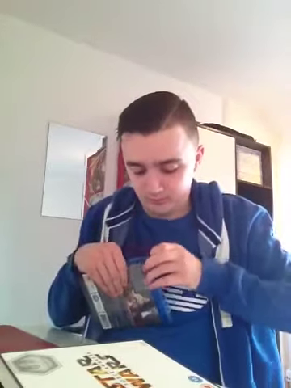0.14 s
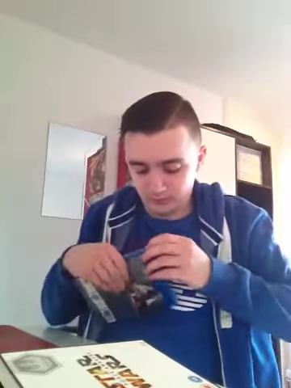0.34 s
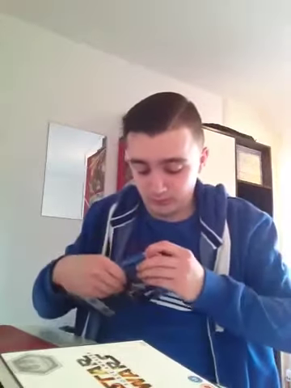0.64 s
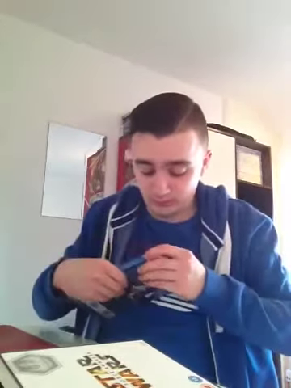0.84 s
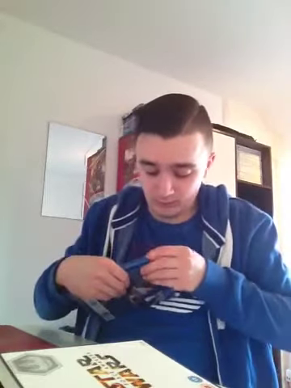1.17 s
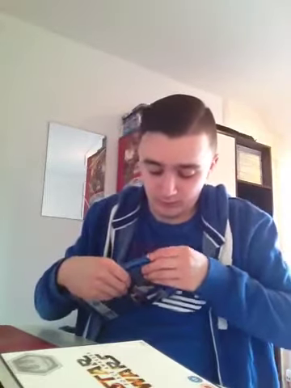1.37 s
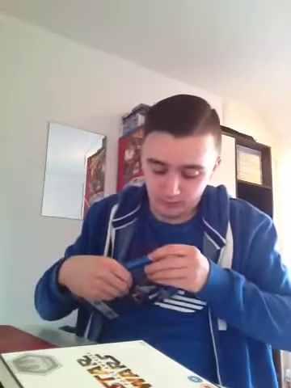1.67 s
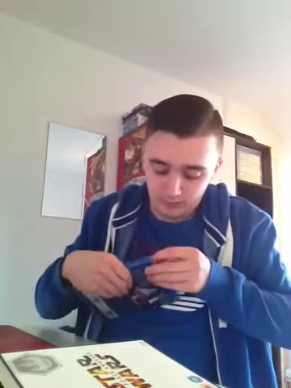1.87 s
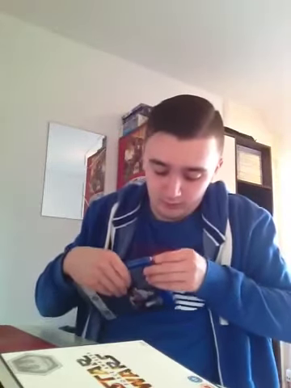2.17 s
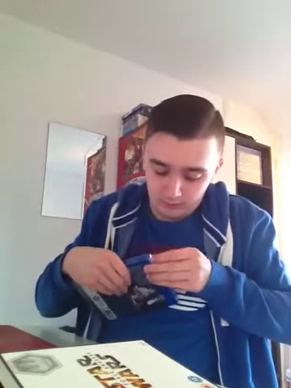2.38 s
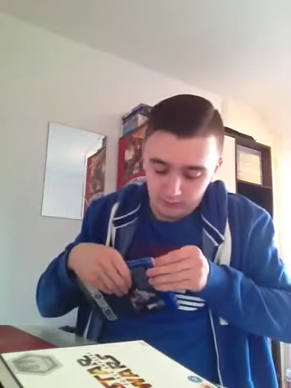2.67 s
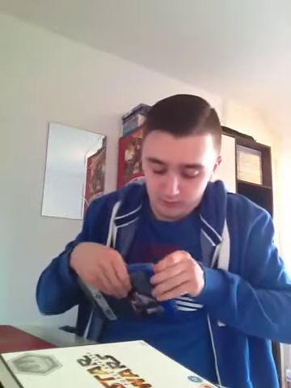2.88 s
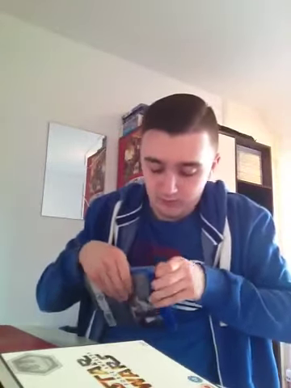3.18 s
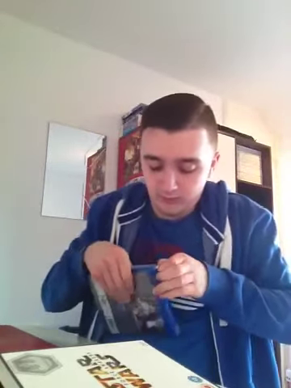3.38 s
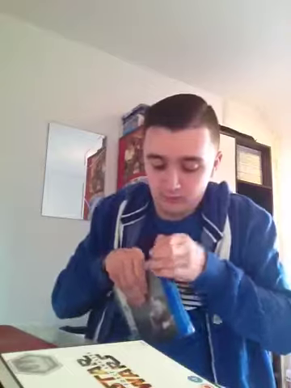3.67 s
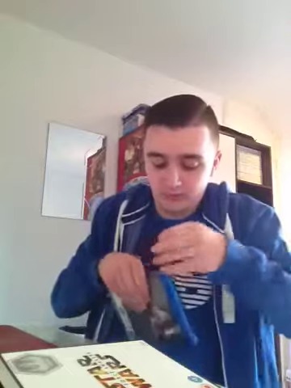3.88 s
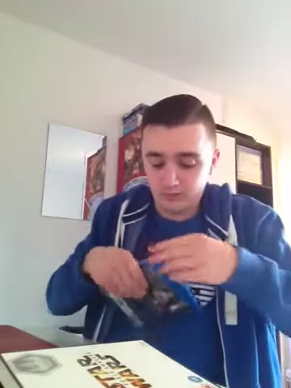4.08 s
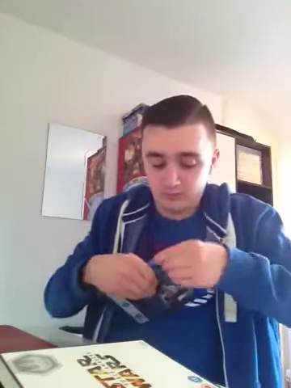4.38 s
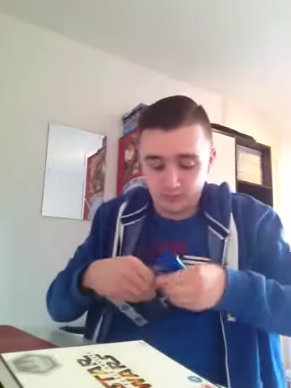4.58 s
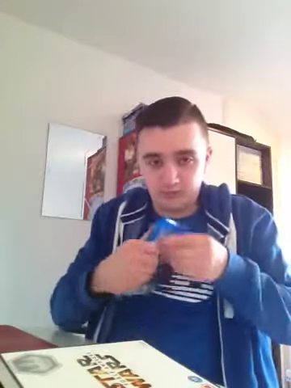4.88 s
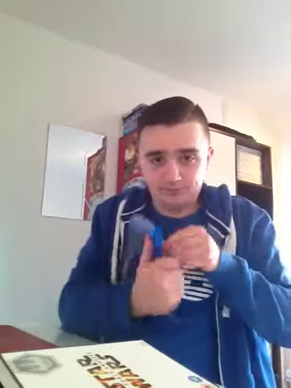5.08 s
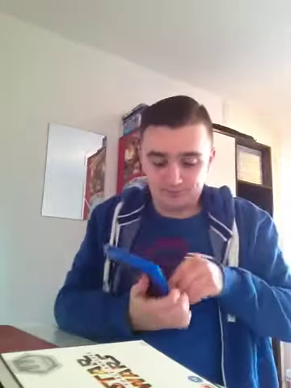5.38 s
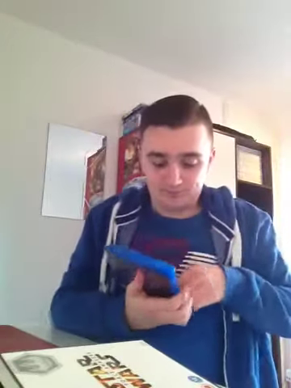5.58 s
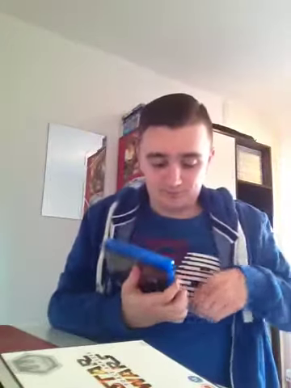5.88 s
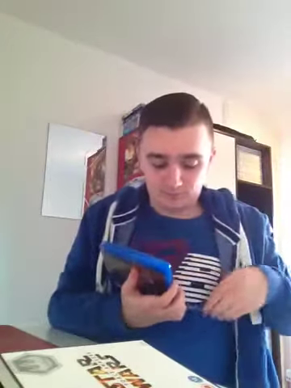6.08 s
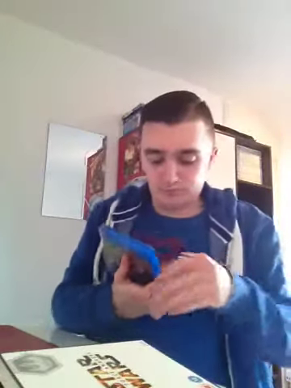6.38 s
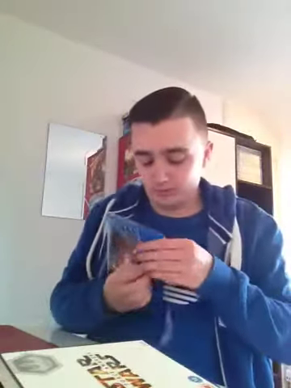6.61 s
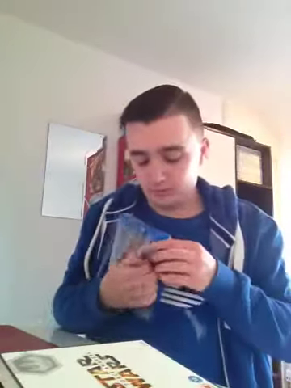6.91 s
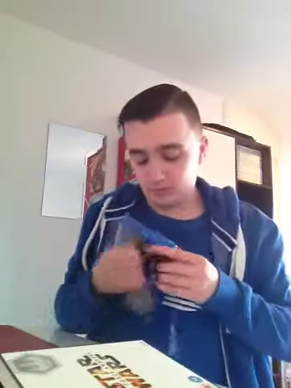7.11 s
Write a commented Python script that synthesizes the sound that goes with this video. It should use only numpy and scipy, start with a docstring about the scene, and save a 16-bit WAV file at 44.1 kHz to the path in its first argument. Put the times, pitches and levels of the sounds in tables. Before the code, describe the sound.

Fingers pick at tight plastic film on a hollow disc case. Faint, scattered crackles and a few light knocks come first, then snaps grow sharper and closer together, peaking in short tears and bright pops past the middle. Softer rubbing and crinkling follow, with more snaps and a hollow knock late on. Recorded at arm's length in a small furnished room over faint hiss.

```python
"""Peeling film off a disc case

Hands pick and peel thin shrink-wrap off a hollow plastic disc case, at arm's length in a small room.
Film snaps and crackles are shaped noise bursts; knocks ring the case's modes and skin rubs it as filtered slips.
A thin squeak is a wavering tone. Film and case get short room tails, the bursts early bounces too, over faint hiss."""
import sys
import numpy as np
from scipy import signal
from scipy.fft import rfft, irfft
from scipy.io import wavfile
from scipy.ndimage import uniform_filter1d

SR = 44100
rng = np.random.default_rng(int(sys.argv[2]) if len(sys.argv) > 2 else 0)


def wav_record(signal):
    """Record a signal, one row per channel, as 16-bit PCM in the file named by sys.argv[1]."""
    frames = np.transpose(np.atleast_2d(signal))
    bounded = np.clip(frames, -1, 1)
    # unit amplitude maps onto the largest positive 16-bit level
    quanta = np.round(bounded * 32767).astype(np.int16)
    wavfile.write(sys.argv[1], SR, quanta)


N = 319725  # length in samples

# Source levels below are set before each function's trim.
# Large film creases flipping: start_s [s], crack_db [dB], ring_db of the taut film [dB]
SNAPS = [(0.0412, -51, -46.5), (0.2051, -50.5, -56), (0.2325, -46, -67), (0.2585, -43.5, -56),
         (0.6284, -58, -69), (0.7119, -54.5, -58), (0.727, -60, -57.5), (0.9654, -55, -66),
         (1.0309, -51.5, -58.5), (1.1025, -42.5, -57.5), (1.2174, -50, -51.5), (1.265, -55, -72),
         (1.3164, -41.5, -41), (1.4149, -51.5, -50.5), (1.4873, -47, -69), (1.5266, -52.5, -63.5),
         (1.864, -46.5, -48), (1.9094, -49, -58), (1.9634, -57, -63), (2.0463, -57.5, -64),
         (2.0851, -41, -52), (2.1014, -38.5, -49), (2.1897, -47, -57), (2.2334, -40, -47.5),
         (2.2748, -48, -62), (2.4457, -59, -70), (2.465, -55, -64), (2.4796, -51, -60), (2.56, -56, -61),
         (2.6646, -49, -55.5), (2.916, -51.5, -62), (3.0602, -40, -47.5), (3.0887, -37, -54),
         (3.2426, -44.5, -54), (3.2587, -46.5, -45), (3.3, -47, -77), (3.313, -64, -51.5),
         (3.3687, -47, -66), (3.4458, -29, -49), (3.4553, -41, -40), (3.4956, -40, -69),
         (3.522, -43.5, -47.5), (3.6734, -50, -58), (3.7932, -45, -52), (3.8708, -47.5, -63),
         (4.1133, -51.5, -55), (4.157, -41.5, -44), (4.217, -52, -56), (4.252, -52, -53),
         (4.3033, -42.5, -52), (4.319, -45.5, -45), (4.3306, -28, -39), (4.372, -30.5, -37.5),
         (4.4032, -34.5, -53), (4.4272, -40, -41.5), (4.4464, -33.5, -55), (4.6077, -34.5, -47),
         (4.6188, -35, -43.5), (4.6469, -30.5, -33), (4.6506, -27.5, -53), (4.6597, -36.5, -28.5),
         (4.666, -47, -33), (4.844, -45, -47.5), (5.1238, -39.5, -41), (5.1793, -40.5, -71),
         (5.218, -42, -59), (5.2977, -40, -59), (5.3286, -39, -48), (5.499, -46.5, -58), (5.5771, -46, -67),
         (6.0608, -53, -54), (6.236, -37, -56), (6.2499, -37.5, -50), (6.358, -50, -49), (6.5573, -32, -50),
         (6.6112, -36.5, -46), (6.6275, -37.5, -39.5), (6.7885, -33.5, -55.5), (6.9221, -45, -51),
         (7.0086, -36.5, -44), (7.0686, -42.5, -52.5), (7.169, -46.5, -53), (7.1955, -45, -61)]
# Fingers knocking or flexing the case:
# start_s [s], tick_db of contact [dB], thump_db [dB], clack_db [dB], hollow_db [dB]
KNOCKS = [(0.04, -40.5, -54.5, -58, -43), (0.255, -46.5, -71, -50, -77), (0.793, -67, -74.5, -60.5, -68),
          (1.316, -32, -40.5, -40, -41), (2.1, -51.5, -57.5, -58, -61), (2.232, -62, -64, -60, -83),
          (2.664, -55, -59.5, -62.5, -62), (3.061, -54.5, -65, -71, -60), (3.242, -54, -55.5, -58.5, -58),
          (3.261, -70, -56.5, -56, -80), (3.445, -41.5, -51, -46.5, -47.5),
          (3.785, -45.5, -60.5, -47.5, -64), (4.157, -54, -63, -59, -69), (4.331, -48, -59.5, -55, -49),
          (4.447, -57, -63, -53, -69), (4.647, -52, -57, -56, -49.5), (4.848, -53.5, -57, -58, -57),
          (4.904, -70, -54, -72, -57), (4.935, -65, -55, -54, -58), (4.99, -74, -58.5, -68, -62),
          (5.123, -49, -68, -54.5, -58), (5.305, -71, -58.5, -67, -61), (5.331, -50, -56, -58, -50),
          (5.526, -75, -59.5, -62.5, -59), (5.823, -59, -65, -56.5, -61), (6.296, -57, -61.5, -57, -64),
          (6.611, -62, -51, -65, -42), (6.628, -32, -41, -38, -39), (6.972, -58, -68, -57, -53),
          (7.193, -46.5, -62, -51, -54)]
# Film tearing, peeling or dragging: start_s [s], length_s [s], level_db [dB]
TEARS = [(2.062, 0.11, -57.5), (2.224, 0.084, -54), (3.465, 0.049, -49), (3.765, 0.05, -49),
         (4.14, 0.022, -48), (4.324, 0.04, -40), (4.39, 0.099, -50.5), (4.616, 0.042, -36),
         (4.825, 0.02, -52.5), (5.275, 0.095, -50), (5.514, 0.056, -54), (5.626, 0.03, -49.5),
         (6.186, 0.068, -51.5), (6.316, 0.059, -54.5), (6.614, 0.027, -43.5), (6.791, 0.011, -45)]
# How hard the hands work: time_s [s], film_db of crinkling [dB], skin_db of skin and sleeve rubbing [dB]
HAND_EFFORT = [(0.0, -69, -65.5), (0.46, -62.5, -64), (0.8, -91, -71.5), (1.18, -93, -77), (1.38, -59, -66),
               (1.7, -76.5, -72.5), (2.4, -73.5, -68.5), (2.72, -72, -71.5), (3.05, -84, -75),
               (3.24, -64, -62.5), (3.45, -81, -57.5), (3.73, -53, -61.5), (3.98, -87, -66.5),
               (4.18, -49.5, -62), (4.42, -66, -62), (4.68, -53, -68.5), (4.97, -62, -60), (5.13, -54, -62),
               (5.6, -58.5, -61), (5.97, -61, -70.5), (6.06, -54, -65.5), (6.28, -50.5, -71),
               (6.52, -60.5, -60), (6.66, -77, -56), (6.8, -58, -57), (7.0, -60, -62), (7.25, -48, -50.5)]
# Fingertip squeaking on taut film: time_s [s], pitch_hz [Hz], level_db [dB]
SQUEAK_PATH = [(1.672, 11600, -82), (1.71, 12350, -74), (1.74, 12350, -82), (1.79, 12850, -83),
               (1.84, 12100, -79)]
# Resonances of the hollow case: pitch_hz [Hz], relative level_db [dB], t60_s [s]
CASE_MODES = [(200, -3, 0.17), (261.6, 8, 0.11), (327, 2.5, 0.3), (359, -3, 0.2), (400, 8, 0.19),
              (590, 3, 0.21), (646, -5, 0.31), (722, 12, 0.12), (782, 5, 0.33), (903, -15, 0.21),
              (1028, -29, 0.12), (1234, -24, 0.02), (1650, -5, 0.34), (2010, 20.5, 0.24),
              (2450, 32.5, 0.031)]
# Bounces off the desk and a box on it: nominal delay_s [s], level_db re the direct sound [dB]
BOUNCES = [(.0009, -14.5), (.0019, -6.5), (.0026, -8)]

# Filter outlines, all with columns: frequency_hz [Hz], gain_db [dB]
# fine crinkling and tearing film
CRINKLE_COLOUR = [(60, -59), (400, -1.5), (900, -2), (1500, -3), (2800, -8), (4300, -1.5), (5800, -1.5),
                  (8000, 1.5), (12000, 0), (15500, -2)]
# skin and sleeve sliding on the case
RUB_COLOUR = [(50, -54), (90, -16), (150, -3.5), (280, 4), (480, -3.5), (850, -3.5), (1500, -8),
              (3000, -9.5), (8000, -18.5)]
# low body of a knock
THUMP_COLOUR = [(30, -30), (85, -31), (150, -2.5), (300, 3), (450, -5.5), (580, 0), (750, -12),
                (1500, -39.5)]
# rattle of the lid
CLACK_COLOUR = [(300, -23), (700, -5), (1000, -11.5), (1500, 7.5), (2000, -18), (2700, -7), (3500, -2.5),
                (6000, -10.5), (12000, -10)]
# loose film facet
CRACK_COLOUR = [(1200, -46.5), (2200, -2), (3000, -20), (4500, -28), (6000, -1), (8000, 0), (11000, 0.5),
                (15500, 1)]
# contact with the case
TICK_COLOUR = [(70, -25), (200, -4), (700, 9.5), (1500, 4), (2500, -1.5), (3400, -8.5), (8000, -11)]
# steady background hiss
HISS_COLOUR = [(15, -58), (25, -13), (64, -29.5), (164, 2.5), (281, 2), (389, -3), (1110, -7.5),
               (3090, -11.5), (4150, -10.5), (5730, -12), (6730, -10), (14300, -19), (15500, -13)]

HISS_DB = -70  # rms before the top cut
TOP_HZ = 15500
ROOM_T60_S, BASS_T60_S = 0.3, 0.39
# a snap on slack film hardly rings and is bright; on taut film it is duller
BRIGHT_DB_PER_DB, NEUTRAL_CRACK_OVER_RING_DB, MAX_BRIGHT_DB = 0.82, 10.5, 16
# stray creases; STRAY_FOLLOW is dB of crack per dB of film effort
STRAY_PER_S, STRAY_DB, STRAY_SPREAD_DB, STRAY_RING_DB, STRAY_FOLLOW = 4, -59.5, 1.5, -6, 0.49
SNAP_TICK_DB = -17.5  # case tick under every snap, re the untrimmed crack


def undb(db):
    """Turn decibels into gain."""
    return 10 ** (np.asarray(db) / 20)


def level(x, db, seconds):
    """Scale x so that its energy, spread over the given time, has this rms level."""
    return x * undb(db) * np.sqrt(seconds * SR / (np.sum(x ** 2) + 1e-18))


def add(track, start_s, x):
    """Mix x into the track at its start time."""
    i = int(np.clip(start_s * SR, 0, N - 1))
    track[i:i + len(x)] += x[:N - i]


def colour(x, points, size=2048):
    """Shape the spectrum with a minimum-phase filter, so no sound leaks ahead of the attack."""
    hz, db = np.transpose(points)
    bins_hz = np.linspace(1, SR / 2, size // 2 + 1)
    gain = undb(np.interp(np.log(bins_hz), np.log(hz), db))
    # folding the cepstrum forward makes the filter causal
    cepstrum = irfft(np.log(gain))
    cepstrum[1:size // 2] *= 2
    cepstrum[size // 2 + 1:] = 0
    impulse = irfft(np.exp(rfft(cepstrum)))
    return signal.fftconvolve(x, impulse)[:len(x)]


def resonate(x, hz, width_hz):
    """Ring x through one resonance with gain 1 at its centre."""
    b, a = signal.iirpeak(min(hz, .45 * SR), hz / width_hz, fs=SR)
    return signal.lfilter(b, a, x)


def fade(t, t60):
    """Decay exponentially, 60 dB down after t60 seconds."""
    return np.exp(-np.log(1000) * t / t60)


def walk(rate):
    """Wander smoothly between random values, drawn at this many per second."""
    k = int(SR / rate)
    steps = np.repeat(rng.standard_normal(N // k + 1), k)
    return uniform_filter1d(steps, k)[:N]


def tail(db, t60):
    """Diffuse echo of a small furnished room as fading noise, re a sound of unit energy."""
    t = np.arange(SR // 3) / SR
    build = np.clip((t - .003) / 0.0024, 0, 1)  # silent for 3 ms, then a quick rise
    return level(rng.standard_normal(len(t)) * build * fade(t, t60), db, 1 / SR)


def room(x, room_db=-3.0):
    """Mix a sound with its own echo, using the longer decay."""
    return x + signal.fftconvolve(x, tail(room_db, BASS_T60_S))[:N]


def desk(x):
    """Add the first bounces to the direct sound, with path lengths varying by up to a fifth."""
    out = x.copy()
    path = 1 + .2 * rng.uniform(-1, 1)
    for delay_s, db in BOUNCES:
        late = np.pad(x, (int(path * delay_s * SR), 0))[:len(x)]
        out += undb(db) * late
    return out


def slips(n, rate, spread_db):
    """Tiny slips at random moments, many weak and a few strong, at rms 1."""
    sizes = undb(spread_db * np.minimum(rng.exponential(size=n), 4))
    happens = rng.random(n) < rate / SR
    return level(happens * sizes * rng.choice([-1, 1], n), 0, n / SR)


def flip(t60, room_db, room_t60):
    """Plastic gives way in a run of slips, a fading noise burst whose radiation raises its own tail."""
    t = np.arange(4096) / SR
    attack = np.clip(t / 0.0011, 0, 1)
    direct = desk(rng.standard_normal(len(t)) * fade(t, t60) * attack)
    out = tail(room_db, room_t60)
    add(out, 0, level(direct, 0, 1 / SR))
    return out


def crinkle(n, rate, spread_db, facet_db=6, flip_t60=0.0038, room_db=-4):
    """Creases of eight sizes flip at random for n samples; each size resonates at its own pitch."""
    out = 0
    pitches = np.geomspace(2500, 14000, num=8)
    ease = signal.windows.tukey(n, min(1, 0.0054 * SR / n))
    for hz in pitches:
        moments = ease * slips(n, rate / len(pitches), spread_db)
        flips = signal.fftconvolve(moments, flip(flip_t60, room_db, ROOM_T60_S))
        out = out + flips + undb(facet_db) * resonate(flips, hz, 1300)
    return colour(out, CRINKLE_COLOUR)


def hiss():
    """Steady coloured noise behind everything."""
    return level(colour(rng.standard_normal(N), HISS_COLOUR), HISS_DB, N / SR)


def handling(crinkle_db=-4, rub_db=-4):
    """Film crinkles finely under the fingers while skin and sleeves slide on the case."""
    time_s, *columns = np.transpose(HAND_EFFORT)
    film_db, skin_db = (np.interp(np.arange(N) / SR, time_s, c) for c in columns)
    film = level(crinkle(N, rate=380, spread_db=5.5)[:N], crinkle_db, N / SR)
    skin = level(colour(slips(N, rate=900, spread_db=4.5), RUB_COLOUR), rub_db, N / SR)
    # both levels waver quickly around the hand effort
    film = film * undb(film_db + 2 * walk(30))
    skin = skin * undb(skin_db + 2 * walk(34))
    return film + room(skin)


def squeak(jitter=0.004, ease_share=0.2):
    """Film sticks and slips so fast that it gives a thin, unsteady whistle, made as a wavering sine."""
    time_s, hz, db = np.transpose(SQUEAK_PATH)
    out = np.zeros(N)
    t = np.arange(time_s[0], time_s[-1], 1 / SR)
    pitch_hz = np.interp(t, time_s, hz) * (1 + jitter * walk(800)[:len(t)])
    tone = np.sqrt(2) * np.sin(2 * np.pi * np.cumsum(pitch_hz) / SR)
    ease = signal.windows.tukey(len(t), ease_share)
    add(out, time_s[0], tone * undb(np.interp(t, time_s, db)) * ease)
    return room(out, room_db=-6)


def tears(tear_db=0.0):
    """A tear runs through the film as a dense train of tiny breaks."""
    out = np.zeros(N)
    for start_s, length_s, db in TEARS:
        breaks = crinkle(int(length_s * SR), rate=1600, spread_db=3.0)
        add(out, start_s, level(breaks, db + tear_db, length_s))
    return out


def ticks(contact_t60=0.0073, room_db=-5, lag_s=0.0006, tick_db=0):
    """Each knock has a sharp tick of contact, a short noise burst, at its start."""
    out = np.zeros(N)
    for start_s, tick, *_ in KNOCKS:
        contact = colour(flip(contact_t60, room_db, ROOM_T60_S), TICK_COLOUR)
        add(out, start_s + lag_s, level(contact, tick + tick_db, .005))
    return out


def knocks(blow_t60=0.059, room_db=-2, modes_db=-3, thump_db=2.5, clack_db=-2.0, hollow_db=-3.0,
           hollow_hz=830, hollow_width_hz=230):
    """The hand-damped shell gives a brief rattle and rings in its modes: thump, clack and hollow ring."""
    out = np.zeros(N)
    t = np.arange(SR // 3) / SR
    span_s = .03
    for start_s, _, thump, clack, hollow in KNOCKS:
        # the place of the blow decides which way each mode starts to swing
        struck = rng.choice([-1, 1], len(CASE_MODES))
        modes = np.zeros(len(t))
        for sign, (hz, db, t60) in zip(struck, CASE_MODES):
            modes += sign * undb(db) * np.sin(2 * np.pi * hz * t) * fade(t, t60)
        modes = level(modes, modes_db, 1 / SR)
        body = modes + flip(blow_t60, room_db, BASS_T60_S)
        lid = modes + flip(blow_t60, room_db, ROOM_T60_S)
        cavity = modes + flip(blow_t60, room_db, BASS_T60_S)
        cavity = resonate(cavity, hollow_hz, hollow_width_hz)
        cavity = resonate(cavity, hollow_hz, 2 * hollow_width_hz)
        add(out, start_s, level(colour(body, THUMP_COLOUR), thump + thump_db, span_s))
        add(out, start_s, level(colour(lid, CLACK_COLOUR), clack + clack_db, span_s))
        add(out, start_s, level(cavity, hollow + hollow_db, span_s))
    return out


def strays():
    """List small creases that let go at random, stronger when the film is worked harder."""
    time_s, film_db, _ = np.transpose(HAND_EFFORT)
    place, size = rng.random((int(STRAY_PER_S * N / SR), 2)).T
    starts_s = place * N / SR
    effort_db = np.interp(starts_s, time_s, film_db) - film_db.mean()
    crack_db = STRAY_DB + STRAY_FOLLOW * effort_db + STRAY_SPREAD_DB * (2 * size - 1)
    return list(zip(starts_s, crack_db, crack_db + STRAY_RING_DB))


def snaps(rows, slip_t60=0.0095, room_db=-5, ring_hz=4200, ring_width_hz=1400, facet_share=0.66,
          crack_db=1.66, ring_db=-0.6):
    """A crease flips; the loose facet cracks, the taut film rings, the case ticks."""
    out = np.zeros(N)
    span_s = .005
    for start_s, crack, ring in rows:
        slackness_db = crack - ring - NEUTRAL_CRACK_OVER_RING_DB
        bright = np.clip(BRIGHT_DB_PER_DB * slackness_db, -MAX_BRIGHT_DB, MAX_BRIGHT_DB)
        chance = rng.uniform(-0.8, 1, size=3)
        t60 = slip_t60 * 2 ** (.5 * chance[0])
        facet, taut, shell = (flip(t60, room_db, ROOM_T60_S) for _ in range(3))
        # every facet has its own size, and so its own pitch
        facet_hz = 9500 * 2 ** (.5 * chance[1])
        facet = facet + facet_share * resonate(facet, facet_hz, 3800)
        # brightness tilts the one octave around 10 kHz
        tilted = [(hz, db + bright * np.clip(np.log2(hz / 10000), -.5, .5)) for hz, db in CRACK_COLOUR]
        facet = colour(facet, tilted)
        taut_hz = ring_hz * 2 ** (0.082 * chance[2])
        taut = resonate(taut, taut_hz, ring_width_hz)
        taut = resonate(taut, taut_hz, 2 * ring_width_hz)
        add(out, start_s, level(facet, crack + crack_db, span_s))
        add(out, start_s, level(taut, ring + ring_db, span_s))
        add(out, start_s, level(colour(shell, TICK_COLOUR), crack + SNAP_TICK_DB, span_s))
    return out


def scene():
    """Layer film and case in the room over a steady hiss."""
    background = hiss() + handling() + squeak()
    case = knocks() + ticks()
    film = tears() + snaps(strays()) + snaps(SNAPS)
    return (background + case + film)[None]


def record(dry):
    """Cut the top steeply, as the recorder does, with an elliptic low-pass."""
    low_pass = signal.ellip(10, .2, 70, TOP_HZ, fs=SR, output="sos")
    return signal.sosfilt(low_pass, dry)


dry = scene()
out = record(dry)
wav_record(out)
```